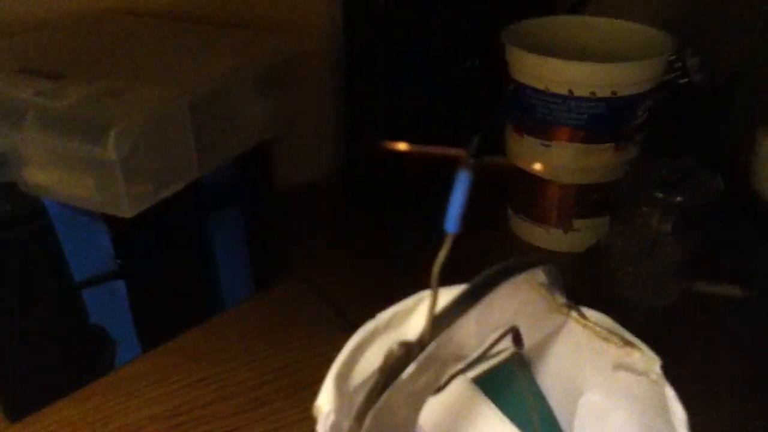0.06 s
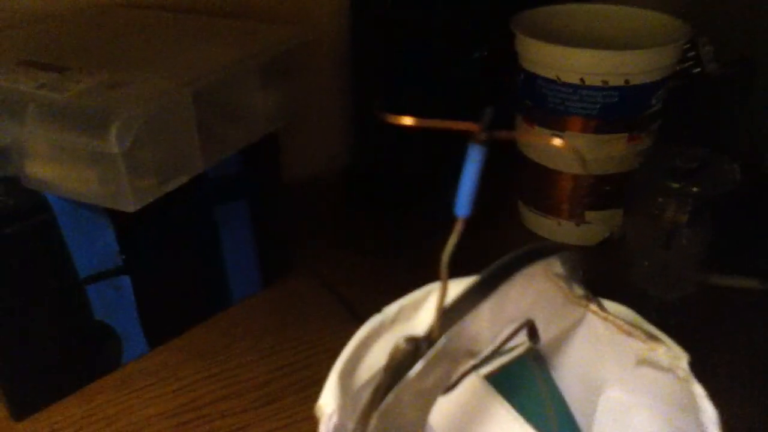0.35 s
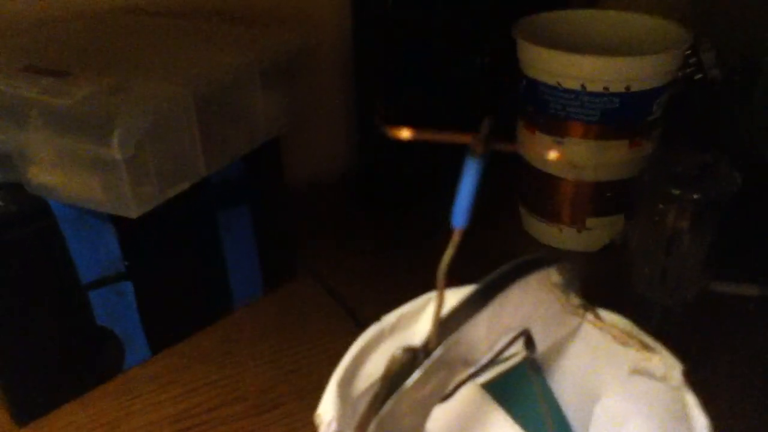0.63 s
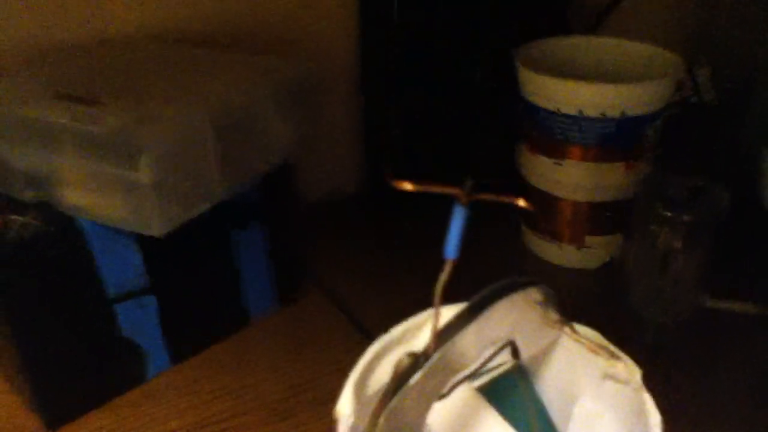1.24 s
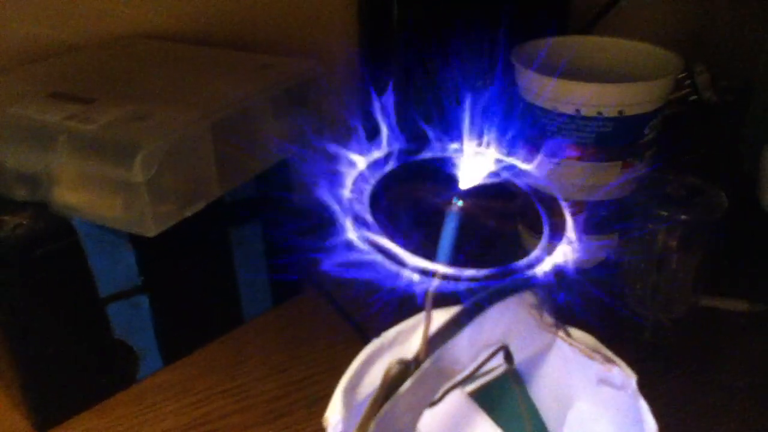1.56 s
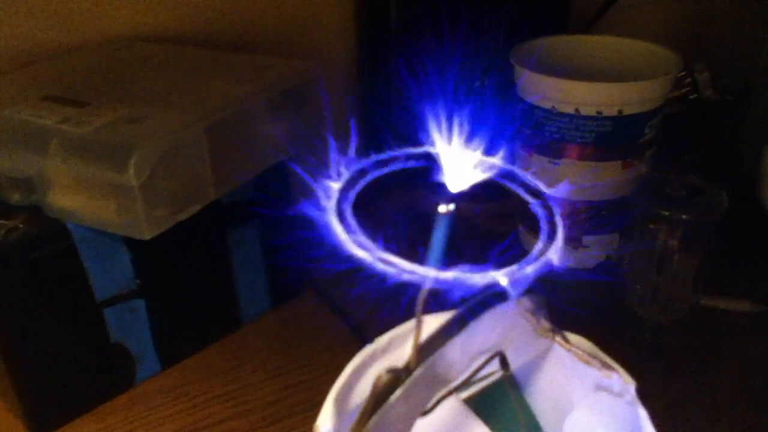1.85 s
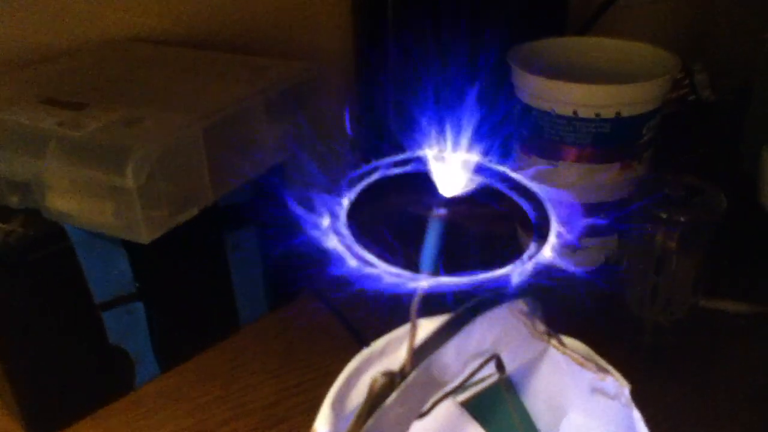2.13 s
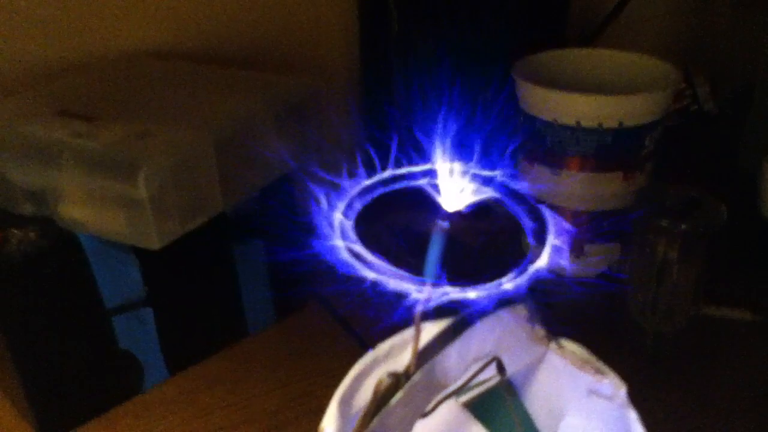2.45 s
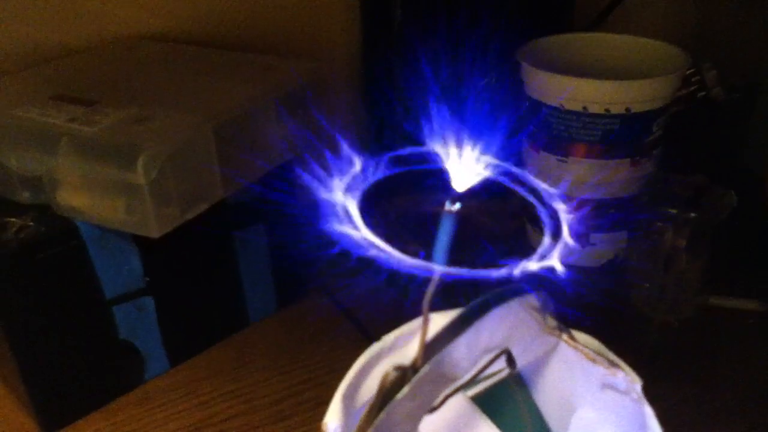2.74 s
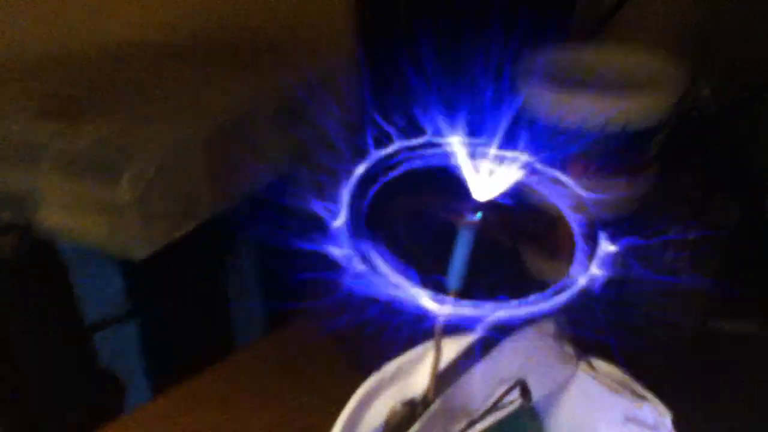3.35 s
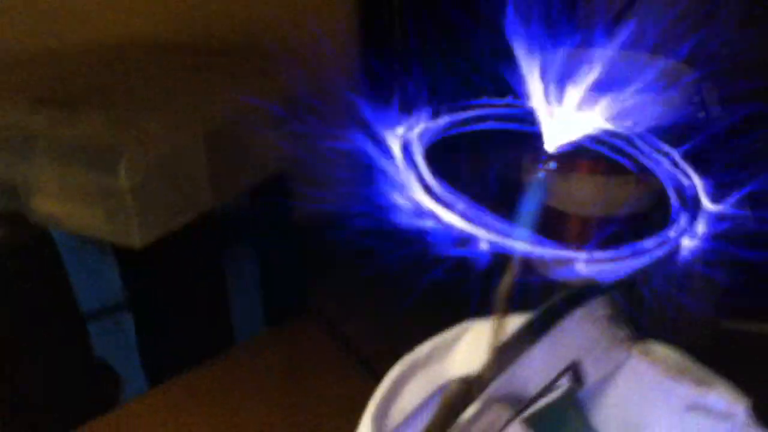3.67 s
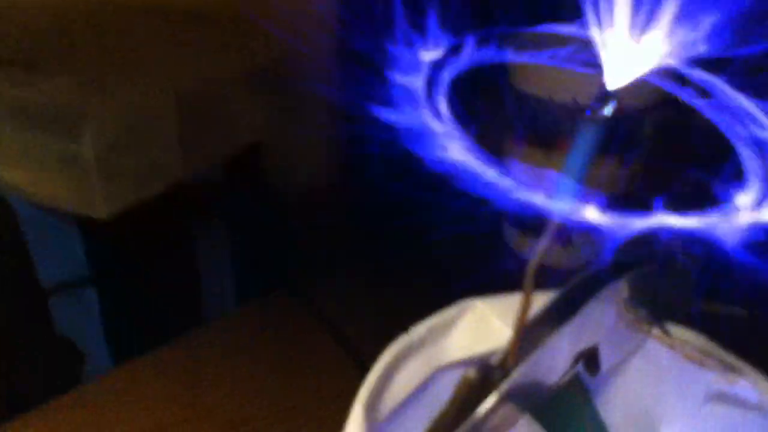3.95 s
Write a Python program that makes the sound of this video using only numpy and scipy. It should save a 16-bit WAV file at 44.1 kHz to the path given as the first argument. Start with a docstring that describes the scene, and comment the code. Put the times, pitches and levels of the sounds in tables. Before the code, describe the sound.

After a quiet moment, a spark snaps and a high-voltage sizzle swells over a hum.

```python
"""A wire rotor on a high-voltage supply, close by in a quiet room. First only low room noise, a thin
electronic whine and two faint, far chirps. At 1.49 s the supply comes on and one spark snaps. Then corona
streams off the spinning tips: a sizzle of tiny streamers, one burst per mains half-wave, over a hum from
the air they heat. Both swell as the discharge grows; the sizzle flares more often towards the end."""
import sys
import numpy as np
from scipy import signal
from scipy.fft import rfft, irfft, next_fast_len
from scipy.io import wavfile
from scipy.ndimage import map_coordinates

SR = 44100
rng = np.random.default_rng(int(sys.argv[2]) if len(sys.argv) > 2 else 0)


def unload_audio(sound):
    """Save the sound as a 16-bit wav file, at the path given as the first command line argument."""
    columns = np.transpose(np.atleast_2d(sound))
    # keep every value between -1 and 1, then stretch to whole-number steps
    steps = np.round(np.clip(columns, -1, 1) * 32767)
    wavfile.write(sys.argv[1], SR, steps.astype(np.int16))


N = 176400

SUPPLY_ON_S = 1.4909
BURST_HZ = 100.0  # mains half-waves
REF_STRENGTH_DB = -27.5  # pivot for hum growth and treble loss


def amp(db):
    """Decibels to gain."""
    return 10 ** (np.asarray(db) / 20)


def unit(x):
    """Scale to rms 1."""
    return x / np.sqrt(np.mean(x ** 2) + 1e-20)


def along(points, hz):
    """Interpolate (frequency [Hz], value) points on a log axis."""
    knots_hz, values = np.transpose(points)
    return np.interp(np.log(hz + 1), np.log(knots_hz + 1), values)


def filtered(x, response):
    """Apply the gain response(hz) to x."""
    size = next_fast_len(N + SR // 2)
    return irfft(rfft(x, size) * response(np.fft.rfftfreq(size, 1 / SR)), size)[:N]


def noise(spectrum):
    """Coloured noise, rms 1."""
    return unit(filtered(rng.standard_normal(N), lambda hz: amp(along(spectrum, hz))))


def wobble(knots_per_s):
    """Smooth random curve, rms near 1."""
    return map_coordinates(rng.standard_normal(N // 100), [np.arange(N) * knots_per_s / SR], mode="wrap")


def echoes(x, t60_s):
    """Diffuse reflections: x through a decaying noise tail of unit energy."""
    t = np.arange(SR // 3) / SR
    tail = rng.standard_normal(len(t)) * amp(-60 * t / t60_s)
    return signal.fftconvolve(x, tail / np.linalg.norm(tail))[:N]


def background(t, air_db=-54, whine_hz=14993, whine_db=-73):
    """Low room noise, a thin electronic whine and two far chirps."""
    # still-room spectrum (frequency [Hz], relative level [dB])
    air_spectrum = [(15, -43), (25, -15), (53, -15.5), (70, -10.5), (129, -3), (174, -7), (210, 0),
                    (270, -12.5), (315, -3.5), (370, -14.5), (430, -8.5), (480, -14.5), (764, -19.5),
                    (1150, -20), (1400, -23.5), (2310, -25), (3360, -26.5), (13300, -29.5), (15600, -32.5)]
    # chirps (start [s], length [s], pitch [Hz], level [dB])
    chirp_events = [(.2, .07, 2640, -73), (.298, .14, 2720, -64.2)]
    whine = amp(whine_db) * np.sin(2 * np.pi * whine_hz * t)
    air = amp(air_db) * noise(air_spectrum)
    chirps = sum(chirp(t, *event) for event in chirp_events)
    return air + np.sqrt(2) * (whine + chirps)


def chirp(t, start_s, length_s, hz, db, rise_hz_per_s=800, jitter_hz=900, edge_s=0.01):
    """Slightly rising squeak; pitch jitter makes it husky."""
    age_s = t - start_s
    pitch_hz = hz + rise_hz_per_s * age_s + jitter_hz * rng.standard_normal(N)
    envelope = np.clip(np.minimum(age_s, length_s - age_s) / edge_s, 0, 1)
    return amp(db) * envelope * np.sin(2 * np.pi * np.cumsum(pitch_hz) / SR)


def click(spectrum, size=2048):
    """Minimum-phase pulse: the sharpest onset for a given spectrum."""
    cepstrum = irfft(np.log(amp(along(spectrum, np.fft.rfftfreq(size, 1 / SR)))))
    cepstrum[1:size // 2] *= 2
    cepstrum[size // 2 + 1:] = 0
    return irfft(np.exp(rfft(cepstrum)))


def spark(gain_db=3.9, echo_db=-9.5):
    """One thin, dry snap at switch-on, scattered by things on the bench."""
    # spark spectrum (frequency [Hz], relative level [dB])
    spark_spectrum = [(40, -13), (150, -5), (300, 1), (900, -0.8), (2000, -1.8), (3500, -1), (8000, -3),
                      (11000, -6.5), (15500, -14), (17000, -30)]
    pulse = click(spark_spectrum)
    snap = np.zeros(N)
    snap[round(SUPPLY_ON_S * SR):][:len(pulse)] = -amp(gain_db) * pulse
    return snap + amp(echo_db) * echoes(snap, t60_s=0.009)


def bursts(t, crest_s=0.0024, onset_share=0.14, exponent=0.99, glow=0.33, spread_db=1.0):
    """Envelope, rms 1: streamers burn while the rectified voltage exceeds onset, over a steady glow."""
    half_waves = (t - crest_s) * BURST_HZ
    voltage = np.abs(np.cos(np.pi * half_waves))
    excess = np.clip((voltage - onset_share) / (1 - onset_share), 0, 1)
    scatter = rng.standard_normal(N // 100)[np.round(half_waves).astype(int)]  # one draw per half-wave
    return unit(glow + excess ** exponent * amp(spread_db * scatter))


def streamer_colour(cracks, strength_db, darken_hz=12800, darken_db_per_db=0.063, size=1024):
    """Stronger streamers are longer and lose top fizz; nearby resonances wander as the tips move."""
    # streamer spectrum below and above 350 Hz (frequency [Hz], relative level [dB])
    low_spectrum = [(25, -31), (70, -10), (150, -10), (350, -14.5)]
    high_spectrum = [(350, -12), (600, -8), (820, -7.5), (980, -5.5), (1110, -6), (1340, -7), (1670, -4),
                     (1860, -3.5), (2160, -4), (2440, -5.5), (3390, -2), (4210, -1.5), (7470, -0.4),
                     (9500, -1.55), (11700, -5), (14000, -8.5), (15600, -14.5)]
    # resonances of things around the rotor (centre [Hz], half-width [Hz], lift [dB])
    bench_modes = [(1130, 34, 4), (1888, 53, 5.5), (2750, 130, 3.5), (3350, 66, 1.5), (3540, 200, 2.5),
                   (7900, 220, -0.5)]
    drift_share, sway_db, drift_per_s = 0.018, 2, 7
    hz, frame_s, spectra = signal.stft(cracks, SR, nperseg=size)
    hz = hz[:, None]
    frames = np.minimum(frame_s * SR, N - 1).astype(int)
    top_shelf = 1 / (1 + (darken_hz / (hz + 1)) ** 8)
    loss_db = darken_db_per_db * top_shelf * (strength_db[frames] - REF_STRENGTH_DB)
    gain_db = along(list(low_spectrum) + list(high_spectrum), hz) - loss_db
    for centre_hz, half_width_hz, lift_db in bench_modes:
        moved_hz = centre_hz * (1 + drift_share * wobble(drift_per_s)[frames])
        peak_db = lift_db * amp(sway_db * wobble(drift_per_s)[frames])
        gain_db += peak_db / (1 + ((hz - moved_hz) / half_width_hz) ** 2)
    return unit(signal.istft(spectra * amp(gain_db), SR, nperseg=size)[1][:N])


def sizzle(t, strength_db, streamers_per_s=32000, spread_db=2.0, gain_db=0.5, body_db=-13.5):
    """Corona: countless tiny cracks, bunched in bursts; flares add longer, darker streamers."""
    # half-waves that flare (time [s], flare strength [dB])
    flares = [(1.782, 1), (2.212, 2.5), (2.652, 3.5), (3.212, 3.5), (3.452, 2.5), (3.56, 5), (3.642, 3.5),
              (3.712, 2.5), (3.782, 2.5), (3.802, 4.5), (3.852, 6.5), (3.873, 4), (3.942, 4), (3.992, 5)]
    # long-streamer spectrum (frequency [Hz], relative level [dB])
    body_spectrum = [(40, -38), (200, -11), (600, -16), (1500, -2.5), (1850, -1), (2300, -8), (3000, 3.5),
                     (7000, -16), (16000, -35)]
    sizes = rng.standard_normal(N) * amp(spread_db * rng.standard_normal(N))
    fires = rng.random(N) < streamers_per_s / SR
    fizz = streamer_colour(sizes * fires, strength_db)
    flare = amp(sum(db * (np.abs(t - time_s) < 0.5 / BURST_HZ) for time_s, db in flares))
    body = amp(body_db) * (flare ** 2 - 1) * noise(body_spectrum)
    return amp(strength_db + gain_db) * bursts(t) * (np.sqrt(flare) * fizz + body)


def room(x, positions=6, t60_s=0.06):
    """Small, dry room; the moving tips crossfade from one reflection pattern to the next."""
    place = np.linspace(0, positions - 1, N)
    fades = (np.sqrt(np.clip(1 - np.abs(place - k), 0, 1)) for k in range(positions))
    return sum(echoes(x * fade, t60_s) for fade in fades)


def hum(t, strength_db, gain_db=-39.5, growth_db_per_db=0.92, delay_s=0.00025, waver_db=1.4):
    """Each burst heats the air and gives it one soft push; the weak overtones waver."""
    # hum partials (multiple of the burst rate, relative level [dB])
    partials = [(1, 1.5), (2, -0.6), (3, -18), (4, -15.5), (5, -12.5), (6, -29), (7, -21)]
    wave = 0
    for multiple, db in partials:
        k = round(multiple)
        level_db = db + waver_db * (k > 2) * wobble(knots_per_s=12)
        wave += amp(level_db) * np.cos(2 * np.pi * k * BURST_HZ * (t - delay_s))
    return np.sqrt(2) * wave * amp(gain_db + growth_db_per_db * (strength_db - REF_STRENGTH_DB))


def scene(flutter_db=0.25, room_db=-12.5):
    """Mono mix: background throughout; spark, sizzle and hum from switch-on."""
    # discharge strength (time [s], level [dB])
    strength_curve = [(1.51, -45.5), (1.55, -42), (1.82, -36), (2.17, -32), (2.47, -32), (2.59, -30.5),
                      (3.76, -26.5)]
    t = np.arange(N) / SR
    live = t > SUPPLY_ON_S
    strength_db = np.interp(t, *np.transpose(strength_curve))
    snap = spark()
    unsteady_db = strength_db + flutter_db * wobble(knots_per_s=70)  # tips swinging past
    discharge = snap + live * sizzle(t, unsteady_db)
    reflections = amp(room_db) * room(discharge)
    return (discharge + reflections + live * hum(t, strength_db) + background(t))[None]


def record(dry, cutoff_hz=15850):
    """Brick-wall low-pass."""
    return filtered(dry[0], lambda hz: hz < cutoff_hz)[None]


dry = scene()
out = record(dry)
unload_audio(out)
```